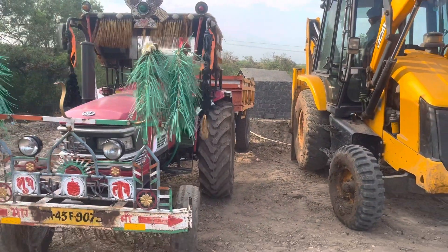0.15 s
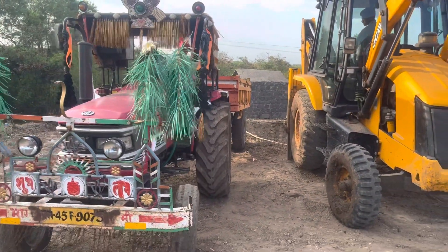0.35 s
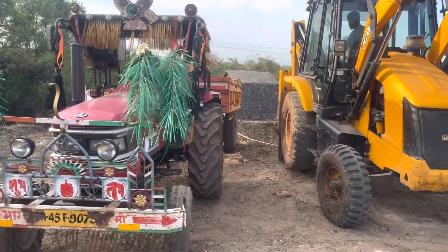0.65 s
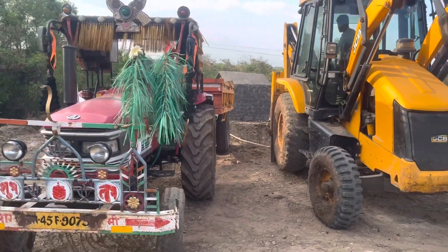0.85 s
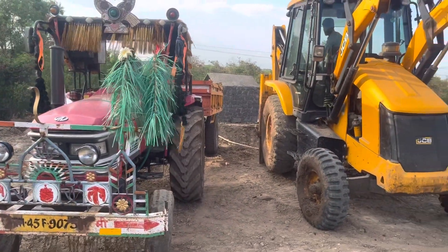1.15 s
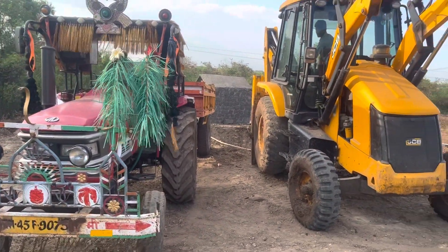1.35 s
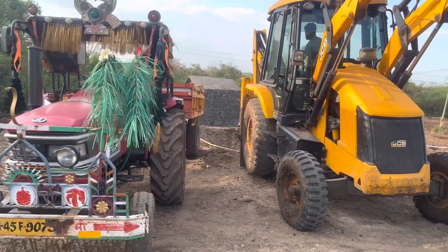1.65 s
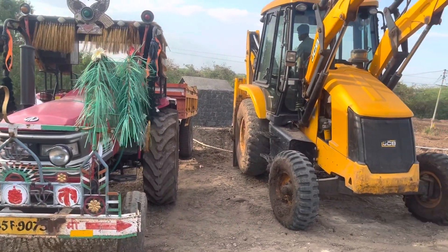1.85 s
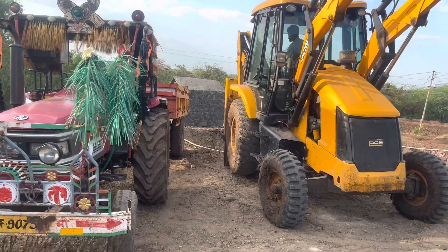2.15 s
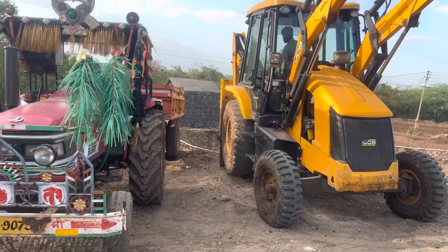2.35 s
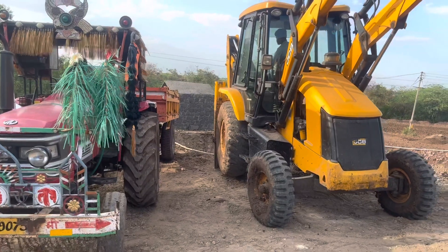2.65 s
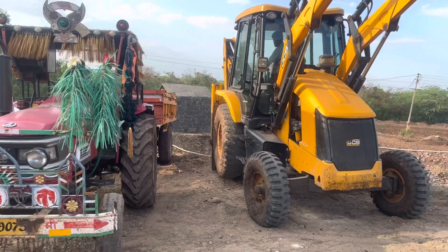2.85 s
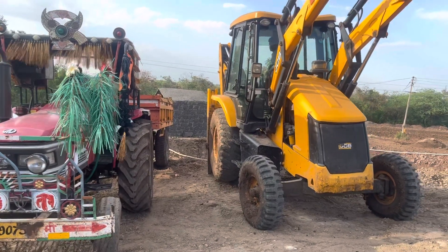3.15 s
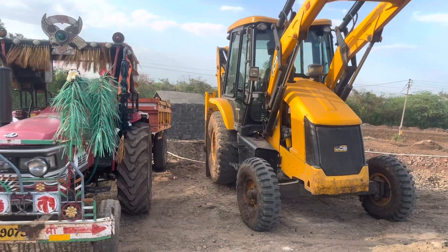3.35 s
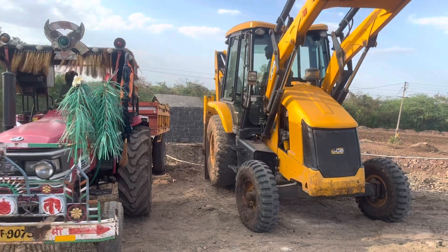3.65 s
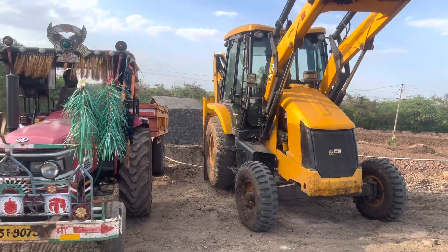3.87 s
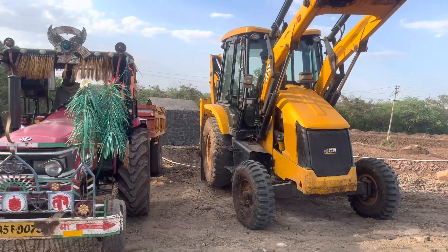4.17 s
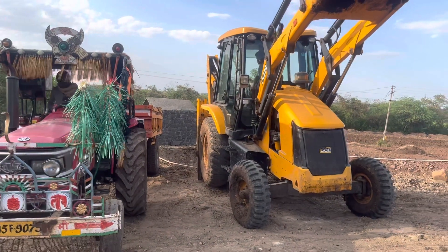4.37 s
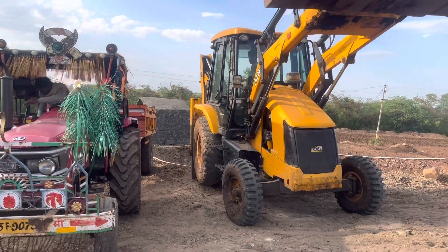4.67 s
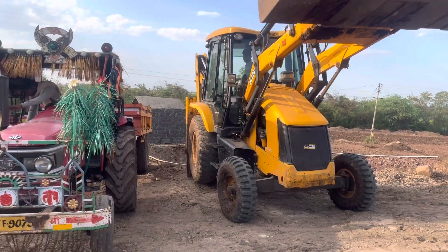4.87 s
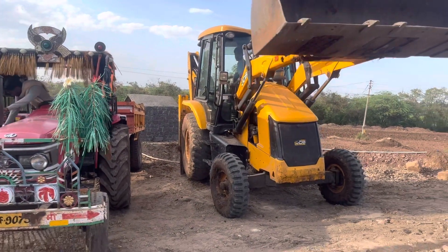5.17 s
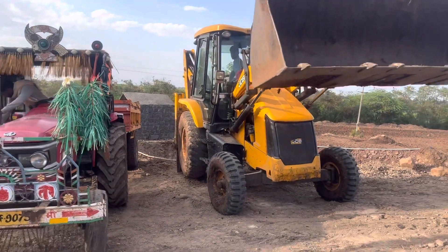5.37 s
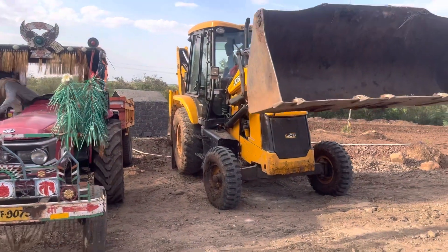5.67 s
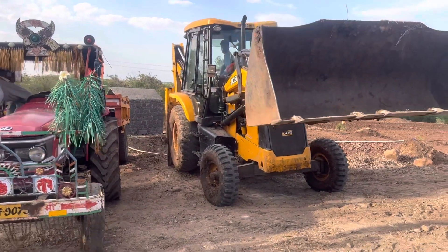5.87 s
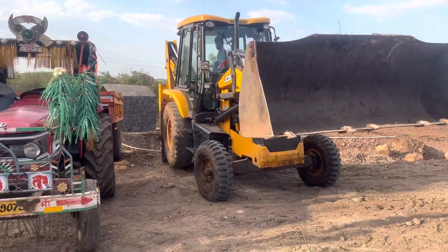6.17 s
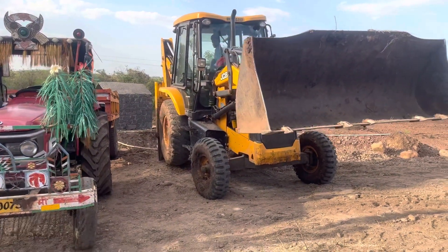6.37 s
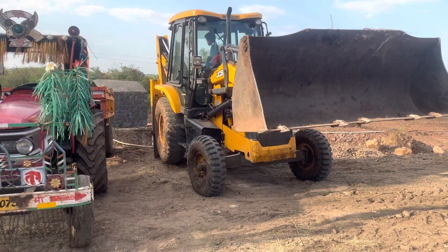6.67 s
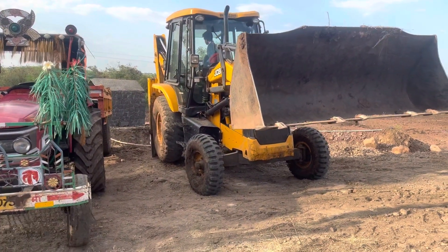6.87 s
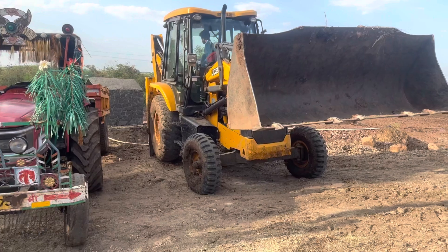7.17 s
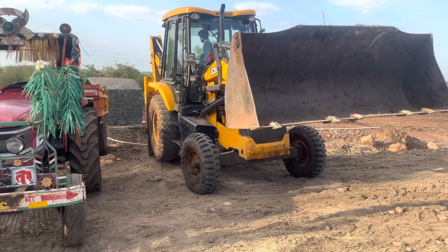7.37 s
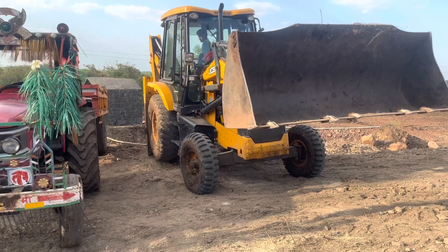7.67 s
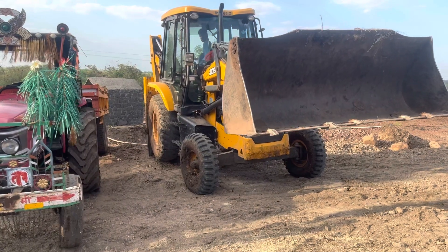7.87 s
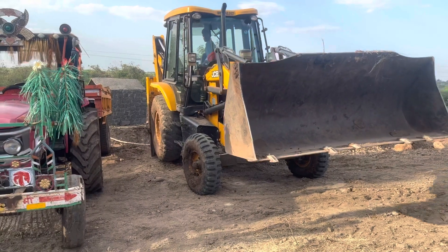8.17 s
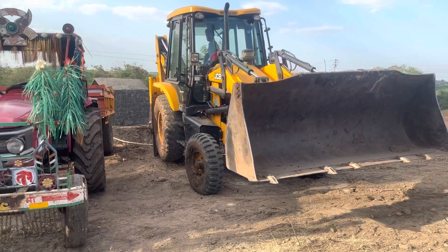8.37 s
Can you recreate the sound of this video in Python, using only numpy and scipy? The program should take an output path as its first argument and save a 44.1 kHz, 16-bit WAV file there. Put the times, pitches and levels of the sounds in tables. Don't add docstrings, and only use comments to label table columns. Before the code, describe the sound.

Outdoors on a dirt site, heard through a phone's two microphones. From 0 s a tractor diesel close on the left chugs and clatters at about 32 firings a second; from roughly 0.5 s it slows, its pulses separating and weakening until it stops around 2.2 s. Small high bells tinkle and shiver, with a loose metal clack near 1.7 s. At 2.0 s a backhoe diesel further ahead cranks, then catches in quickening hard, ringing knocks, strongest around 2.3 s. At 2.4 s the sound jumps to its steady idle: low throbbing exhaust, block clatter and singing panels, the tailpipe hum shifting slightly in strength. Faint bell tinkles continue. Loader arms thud with low booms around 6.1 to 6.4 s; a sharper bucket and pin clank lands at 7.2 s. The idle continues to 8.5 s over faint distant machine rumble.

```python
import sys
import numpy as np
from scipy import signal
from scipy.fft import rfft, irfft, next_fast_len
from scipy.io import wavfile
from scipy.ndimage import uniform_filter1d

SR = 44100
rng = np.random.default_rng(int(sys.argv[2]) if len(sys.argv) > 2 else 0)


def boost_factor(decibels):
    exponent = np.asarray(decibels, float) / 20
    return 10 ** exponent


def transcribe(u):
    v = np.clip(np.atleast_2d(u).T, -1, 1)
    q = np.round(v * 32767).astype(np.int16)
    wavfile.write(sys.argv[1], SR, q)


N = 375732
PADDED = next_fast_len(N + 8192)
HZ = np.maximum(np.arange(PADDED // 2 + 1) * SR / PADDED, 1)
JUMP_S = 2.4

CYLINDERS_DB = [
    [2.5, 2, 2],
    [0.21, -1.1, -0.47, -0.17],
]
# start_s, peak_db
FIRST_FIRINGS = [(2.126, -19.5), (2.179, -16), (2.223, -15), (2.26, -9), (2.291, -10), (2.323, -2),
                 (2.359, -21)]


def rms_one(x):
    return x / np.sqrt(np.mean(x ** 2) + 1e-20)


def in_time(rows):
    s, *columns = np.transpose(rows)
    return [np.interp(np.arange(N) / SR, s, c) for c in columns]


def over_hz(rows):
    hz, *columns = np.transpose(rows)
    return [np.interp(np.log(HZ), np.log(hz), c) for c in columns]


def resonate(x, hz, width_hz):
    radius, angle = np.exp(-np.pi * width_hz / SR), 2 * np.pi * hz / SR
    return signal.lfilter([0, np.sin(angle)], [1, -2 * radius * np.cos(angle), radius ** 2], x + 1e-18)


def width_of(t60_s):
    return np.log(1000) / np.pi / t60_s


def band(x, low_hz, high_hz, order=2):
    return signal.sosfilt(signal.butter(order, [low_hz, high_hz], "band", fs=SR, output="sos"), x)


def clicks(times_s, sizes):
    out = np.zeros(N)
    out[np.minimum((np.asarray(times_s) * SR).astype(int), N - 1)] = sizes
    return out


def firings(crank, pattern_db, uneven_db):
    turn = np.floor(crank).astype(int)
    size_db = np.resize(pattern_db, 256) + uneven_db * rng.standard_normal(256)
    return np.diff(turn, prepend=turn[0]) * boost_factor(size_db)[turn]


def swell(crank, sharp, lag):
    phase = ((crank - lag) % 1) ** 0.78
    return np.exp(sharp * np.cos(2 * np.pi * (phase - .33)))


def mechanics(crank, pattern_db, colour, body, low_db, high_db, depth, sharp, uneven_db):
    colour_db, = over_hz(colour)
    body_db = sum(db / (1 + (2 * (HZ - hz) / width_hz) ** 2) for hz, width_hz, db in body)
    shape = boost_factor(colour_db + body_db)
    turn = np.floor(crank).astype(int)
    shared_db = np.resize(pattern_db, 256) + uneven_db * rng.standard_normal(256)
    edges_hz = [0, 300, 800, 1500, 7500, SR]
    depth_shares = [0.1, 0.24, 0.71, 0.94, 0.96]
    lags = [0.21, 0.056, 0.11, 0.057, 0.0]
    bands = []
    for low_hz, high_hz, share, lag in zip(edges_hz, edges_hz[1:], depth_shares, lags):
        blow_db = shared_db + 1.54 * uneven_db * rng.standard_normal(256)
        blow = rms_one(swell(crank, sharp, lag) * boost_factor(blow_db)[turn])
        deep = np.clip(depth * share, 0, .97)
        gate = np.sqrt(1 - deep + deep * blow ** 2)
        noise = rfft(rng.standard_normal((2, N)) * gate, PADDED)
        inside = (HZ > low_hz) & (HZ <= high_hz)
        bands.append(irfft(noise * shape * inside, PADDED)[:, :N])
    return boost_factor(low_db) * rms_one(sum(bands[:3])) + boost_factor(high_db) * rms_one(sum(bands[3:]))


def panels(crank, table, pulses):
    shake = rms_one(pulses) + 0.56 * rms_one(swell(crank, 0.95, 0) * rng.standard_normal(N))
    t = np.arange(N) / SR
    out = np.zeros(N)
    for start_s, end_s, hz, width_hz, level_db in table:
        ring = rms_one(resonate(resonate(shake, hz, width_hz), hz, 4 * width_hz))
        fade = np.interp(t, [start_s, start_s + 0.21, end_s - .2, end_s], [0, 1, 1, 0])
        out += boost_factor(level_db) * ring * fade
    return out


def with_scatter(x, lag_s=0.012):
    return np.array([x, np.roll(x, round(lag_s * SR))])


def run_down():
    # start_s, firings_per_s
    speed_curve = [
        (0, 32.13),
        (.462, 35.0),
        (1.92, 10.68),
        (2.16, 8.3),
        (2.3, 0),
    ]
    # full_speed_db, loss_db_per_halving, barely_turning_db
    layers = [
        (-34, 16, -47),
        (-28, 16, -35),
        (-31, 6, -55),
    ]
    speed, = in_time(speed_curve)
    share = np.clip(speed / speed.max(), .25, 1)
    halt_db = 57 * np.maximum(np.arange(N) / SR - 2.17, 0)
    levels_db = [20 * np.log10(boost_factor(db + loss_db * np.log2(share)) + boost_factor(least_db)) - halt_db
                 for db, loss_db, least_db in layers]
    gap_depth = 1.13 + (0.34 - 1.13) * share
    return .395 + np.cumsum(speed) / SR, *levels_db, gap_depth


def tractor():
    # pitch_hz, width_hz, level_db
    body = [(263, 5.1, -4), (640, 68, 5.5), (906, 9.9, 1), (1165, 51, 6), (1246, 90, 4.5), (1774, 136, 9),
            (2160, 180, 2), (2717, 50, 6.5), (3126, 74, 8.5), (3500, 20, 8)]
    # freq_hz, density_db_per_hz
    colour = [(30, 1.5), (150, -5), (400, -2), (1100, -6), (1550, -9), (2000, -5), (3300, -5), (4000, -12),
              (6000, -19), (8500, -18.5), (11000, -22), (13000, -28), (14200, -23), (15500, -29)]
    # start_s, end_s, pitch_hz, width_hz, level_db
    singing = [(.4, .92, 255, 14, -40), (.8, 1.4, 255, 8, -51), (-.2, .9, 905, 14, -43),
               (.7, 2.1, 905, 14, -48), (-.2, .8, 1287, 16, -41.5), (-.2, 1.3, 1142, 22, -42.5),
               (-.2, .9, 625, 20, -46), (-.2, 1.0, 3499, 16, -52.5)]
    crank, exhaust_db, block_db, clatter_db, depth = run_down()
    pulses = firings(crank - .1, CYLINDERS_DB[0], uneven_db=2.0)
    pipe = resonate(pulses, 78, 29)
    pipe = pipe - boost_factor(2.0) * resonate(pulses, 110.5, 49) + boost_factor(-11) * resonate(pulses, 185, 69)
    pipe = band(pipe, 42, 240)
    pipe = pipe / np.sqrt(uniform_filter1d(pipe ** 2, size=8192) + 1e-9)
    noise = mechanics(crank, CYLINDERS_DB[0], colour, body, block_db - 2.0, clatter_db + 1.0,
                      depth, sharp=0.4, uneven_db=0.1)
    return with_scatter(boost_factor(exhaust_db) * pipe + panels(crank, singing, pulses)) + noise


def bells():
    # start_s, peak_db, loudest_hz
    tinkles = [(0.169, -32, 10400), (0.604, -34, 10200), (0.7971, -22.5, 10200), (1.068, -26, 9500),
               (1.2151, -34, 14400), (1.6337, -33, 15000), (1.6565, -38, 14000), (1.679, -26, 10900),
               (1.714, -41, 14500), (2.0313, -30, 15300), (2.132, -37, 10600), (2.2543, -42, 9100),
               (2.4728, -35, 14000), (2.4962, -29, 13500), (2.9183, -38, 10300), (3.3028, -30, 9100),
               (3.3588, -37, 13700), (3.7604, -41, 14600), (4.1674, -36, 13000), (4.5491, -41, 12900),
               (4.9606, -36, 14200), (5.005, -36, 11000), (5.364, -37, 10000), (5.708, -37, 9800),
               (5.734, -31.5, 11700), (6.2352, -41, 11100), (6.4916, -34, 11400), (6.5894, -37, 11000),
               (7.2624, -39, 14900), (8.4188, -35, 13700)]
    # partial_hz, level_db, t60_s
    partials = [(7500, -12, .1), (9232, -5, .17), (10260, 0, .19), (11070, -12, .2), (12330, -8, .1),
                (12910, -10, .15), (13720, -8, .1), (14250, -3, .1), (14900, -6, .08)]
    s, peak_db, _ = np.transpose(tinkles)
    out = np.zeros(N)
    for hz, db, t60_s in partials:
        chance = rng.standard_normal(len(s))
        sizes_db = peak_db + db - 23.0 + 11.0 * np.minimum(chance, 1)
        out += resonate(clicks(s + 0.0065 * abs(chance), boost_factor(sizes_db)), hz, width_of(t60_s))
    t = np.arange(SR // 10) / SR
    for start_s, db, hz in tinkles:
        i = round(start_s * SR)
        ring = boost_factor(db - 2.0 - 60 * t / 0.064) * np.sin(2 * np.pi * hz * t)
        out[i:i + len(t)] += ring[:N - i]
    return out


def jingle():
    sizes = boost_factor(4 * np.minimum(rng.exponential(1, N), 3)) * (rng.random(N) < 90 / SR)
    dealt = rng.integers(0, 14, N)
    partials_hz = np.linspace(9200, 14700, num=14)
    return boost_factor(-54) * sum(resonate(sizes * (dealt == k), hz, 90) for k, hz in enumerate(partials_hz))


def start_and_idle():
    # start_s, firings_per_s
    idle_speed = [(2.4, 32.646), (4.554, 31.74), (5.976, 31.649), (6.032, 31.947), (8.52, 31.862)]
    # start_s, silencer_db, tailpipe_db, block_db, clatter_db
    cranking = [(1.9, -70, -70, -111, -100), (2.0, -45, -52, -32, -35), (2.032, -33, -51, -41, -47.5),
                (2.154, -19, -45, -30.5, -40), (2.33, -18, -14, -25, -34), (2.378, -18, -21, -32.5, -36)]
    # start_s, level_db
    facing = [(2.39, -2), (2.5, -1.5), (2.75, -9.5), (3.1, -4.5), (3.35, -8), (3.5, -4.5), (3.7, -7),
              (4.05, -2), (4.6, 1), (5.3, 1.5), (5.85, 1), (6.1, -2.5), (6.25, 2), (6.45, -2.5),
              (7.05, -0.5), (7.7, -1.5), (8.35, -2.5), (8.52, -5)]
    # level_db, facing_share, drift_db_per_s as the listener backs off
    idling = [
        (-26, 0.15, 0.21),
        (-26, 0.94, 0),
        (-31.5, 0.0028, -0.49),
        (-39.5, 0.12, -0.36),
    ]
    t = np.arange(N) / SR
    turns_s = [2.0, 2.053] + [s for s, _ in FIRST_FIRINGS] + [JUMP_S]
    crank = np.interp(t, turns_s, [-.5, *range(len(FIRST_FIRINGS) + 1), 8.66])
    crank = crank + np.cumsum(in_time(idle_speed)[0] * (t >= JUMP_S)) / SR
    facing_db, = in_time(facing)
    cut = np.interp(t, [cranking[-1][0], facing[0][0]], [0, 1])
    levels_db = []
    for start_db, (db, share, db_per_s) in zip(in_time(cranking), idling):
        idle_db = db + share * facing_db + db_per_s * (t - JUMP_S)
        levels_db.append(start_db + cut * (idle_db - start_db))
    return crank, *levels_db


def knock(crank):
    # pitch_hz, width_hz, level_db
    modes = [(560, 90, -4), (1180, 100, 2), (1710, 130, -7), (2350, 200, -4), (2750, 250, -8),
             (3900, 500, -16)]
    blows = np.hanning(260) * rng.standard_normal(260)
    out = np.zeros(N)
    for k, (hz, width_hz, db) in enumerate(modes):
        ignitions = firings(crank - .08, CYLINDERS_DB[1], uneven_db=2.3)
        struck = signal.oaconvolve(ignitions, np.roll(blows, 37 * k))[:N]
        out += resonate(struck * boost_factor(db), hz, width_hz)
    return rms_one(out)


def backhoe():
    # pitch_hz, width_hz, level_db
    body = [(160, 16, 3), (309.4, 8.7, 9.5), (553, 16, 5.5), (839, 16, 6.5), (1180, 180, 9.5),
            (1370, 38, 5.5), (1705, 110, 7), (2280, 84, 3), (2583, 47, 7), (4590, 79, 6.5)]
    # freq_hz, density_db_per_hz
    colour = [(30, 6), (80, 8.5), (250, -0.5), (600, -1), (1200, -8.5), (1550, -11.5), (2400, -15),
              (3200, -16.5), (5000, -24.5), (6500, -28.5), (8600, -27.5), (12000, -35), (14200, -31.5),
              (15300, -30)]
    # start_s, end_s, pitch_hz, width_hz, level_db
    singing = [(3.6, 4.75, 4600, 60, -57), (4.15, 4.7, 4600, 60, -55), (2.2, 8.7, 160, 12, -46),
               (4.4, 6.05, 835, 22, -45), (3.6, 4.45, 305, 9, -43.5), (6.2, 8.7, 306, 9, -42.5),
               (7.15, 8.05, 355, 9, -50), (4.3, 5.55, 231, 7, -45.5), (5.4, 8.7, 565, 27, -43.5),
               (2.4, 5.4, 1370, 55, -45)]
    pulse_db = [-3.2, -.5, -2.6, 0]
    crank, silencer_db, tail_db, block_db, clatter_db = start_and_idle()
    idle = crank > 8
    late = np.where(idle, .33, 0)
    pulses = np.maximum(firings(crank - late, pulse_db, uneven_db=.45), 0)
    silencer = rms_one(band(resonate(pulses, 61.0, 30.3), 42.0, 97))
    tail = rms_one(band(resonate(pulses, 98.3, 24.4), 81.8, 97.54, order=3))
    edge = rms_one(band(pulses, 162, 249))
    cavity = rms_one(resonate(resonate(pulses, 80, 8), 80, 8))
    silencer = silencer + idle * boost_factor(-15) * cavity
    exhaust = boost_factor(silencer_db) * silencer + boost_factor(tail_db) * tail + boost_factor(block_db - 14.5) * edge
    noise = mechanics(crank, CYLINDERS_DB[1], colour, body, block_db + 1.0, clatter_db + 1.5,
                      depth=0.62, sharp=0.43, uneven_db=1.0)
    knocks = boost_factor(clatter_db - 1) * knock(crank)
    return with_scatter(exhaust + knocks + panels(crank, singing, pulses)) + noise


def catches():
    # pitch_hz, level_db, t60_s
    cold_block = [(490, -3.5, 0.13), (683, -10, 0.097), (793, -8, 0.09), (1070, -9.5, 0.1),
                  (1185, -12.5, 0.1), (1710, -19, 0.026)]
    s, peak_db = np.transpose(FIRST_FIRINGS)
    out = np.zeros(N)
    for k, (hz, db, t60_s) in enumerate(cold_block):
        spread_db = 1.5 * rng.standard_normal(len(s))
        hits = clicks(s + .0012 * k, boost_factor(peak_db + db - 3.0 + spread_db))
        out += resonate(hits, hz, width_of(t60_s))
    return out


def rattles():
    # start_s, peak_db
    loose = [
        ((1900, 4300, 0.074), [(.59, -33), (1.16, -23), (2.054, -26), (4.805, -33), (7.207, -24.5), (8.017, -37)]),
        ((2500, 5200, 0.11), [(2.556, -30), (2.769, -29), (7.225, -24)]),
        ((1030, 1680, 0.11), [(1.66, -11.5), (2.052, -15.5)]),
        ((590, 2250, .13), [(1.661, -14)]),
        ((1250, 2700, 0.12), [(7.224, -21), (7.249, -30)]),
        ((630, 920, 0.19), [(7.225, -17.5)]),
        ((440, 2450, 0.25), [(6.13, -26), (6.239, -28.5), (7.244, -24.5)]),
        ((130, 240, 0.41), [(2.199, -18)]),
        ((6700, 21000, 0.14), [(.795, -26), (1.634, -26), (2.031, -43), (3.298, -23)]),
    ]
    # start_s, peak_db, pitch_hz, t60_s
    booms = [(4.6, -43, 54, 0.55), (6.15, -24.5, 114, 0.34), (6.201, -26, 55.6, 0.65),
             (6.4, -27, 178, 0.38), (7.257, -19.5, 160, 0.28)]
    out, t = np.zeros((2, N)), np.arange(SR // 2) / SR
    jolts = [(s, min(db - 5, -24.5)) for s, db in FIRST_FIRINGS]
    fittings = ((560, 6400, 0.079), jolts)
    for (low_hz, high_hz, t60_s), blows in [*loose, fittings]:
        for s, db in blows:
            burst = rms_one(band(rng.standard_normal((2, len(t))), low_hz, high_hz, order=3))
            i = round(s * SR)
            out[:, i:i + len(t)] += burst * boost_factor(db - 8.5 - 60 * t / t60_s) * np.minimum(t / 0.0013, 1)
    for s, db, hz, t60_s in booms:
        i = round(s * SR)
        envelope = boost_factor(db - 60 * t / t60_s) * np.minimum(t / 0.011, 1)
        out[0, i:i + len(t)] += envelope * np.sin(2 * np.pi * hz * t)
    return out


def rumble():
    return boost_factor(-47) * rms_one(band(rng.standard_normal((2, N)), 28, 110))


def ports(pair, table, leak=0):
    # freq_hz, left_lead_rad, likeness_0_1, left_right_db
    bass = [(20, 0, 1, 0), (90, 0, .999, 0), (180, 0, .99, 0)]
    # freq_hz, left_lag_half_turns, likeness_0_1
    treble_turns = [(7300, .75, .7), (7650, 1, 1), (9350, 1, 1), (9700, 1.3, .75), (10700, 1.75, .7),
                    (11100, 2, 1), (13300, 2, 1), (13700, 2.3, .65), (14400, 2.75, .85), (14700, 3, 1)]
    treble = [(hz, -np.pi * turns, alike - leak, 0) for hz, turns, alike in treble_turns]
    lead_rad, alike, pan_db = over_hz([*bass, *table, *treble])
    alike = np.clip(alike, 0, 1)
    direct, scattered = rfft(pair, PADDED) * np.sqrt([(1 + alike) / 2, (1 - alike) / 2])
    turn = boost_factor(pan_db / 2) * np.exp(.5j * lead_rad)
    return irfft([(direct + scattered) * turn, (direct - scattered) / turn], PADDED)[:, :N]


def scene():
    # freq_hz, left_lead_rad, likeness_0_1, left_right_db
    tractor_side = [(400, 0.19, 0.89, 0), (1000, 0.64, 0.69, 5), (1730, -0.23, 0.18, -0.5),
                    (3080, 1.66, 0.96, 5.5), (5000, 1.4, 0, 4), (6500, 1, 0.4, -1.5)]
    backhoe_side = [(400, 0.3, 1, 0.3), (990, 0.68, 1, 0.5), (1540, -1.67, 0.72, 1.5), (2490, 0.95, 1, 3),
                    (5000, -0.41, 0.33, 2), (7200, -0.78, 0.05, 0)]
    near = ports(tractor(), tractor_side)
    ringing = ports(with_scatter(bells() + jingle()), tractor_side, leak=.35)
    ahead = backhoe() + with_scatter(catches()) + rattles() + rumble()
    return near + ringing + ports(ahead, backhoe_side)


def band_limit(x):
    return signal.sosfilt(signal.butter(12, 15790, fs=SR, output="sos"), x)


def record(dry):
    mix = signal.sosfilt(signal.butter(4, 27, "high", fs=SR, output="sos"), dry)
    return band_limit(mix)


dry = scene()
out = record(dry)
transcribe(out)
```